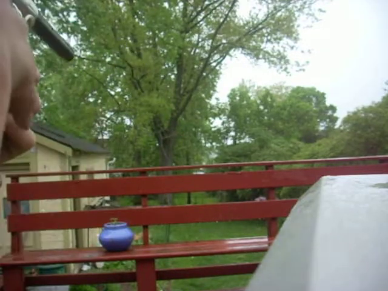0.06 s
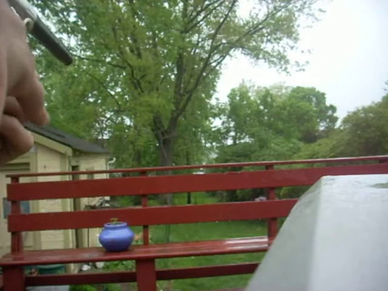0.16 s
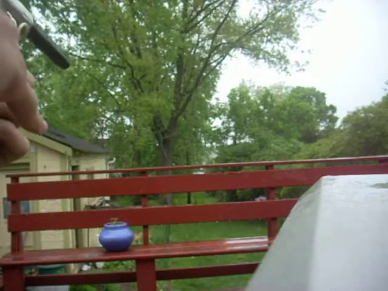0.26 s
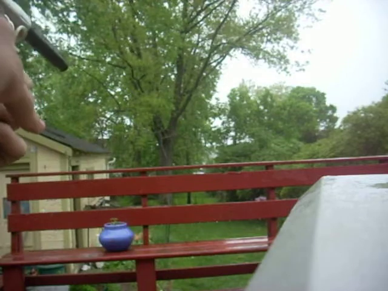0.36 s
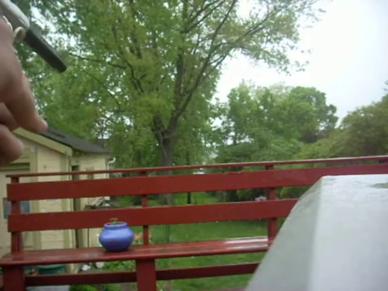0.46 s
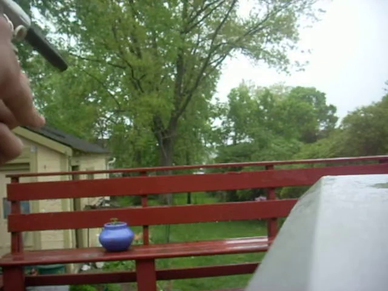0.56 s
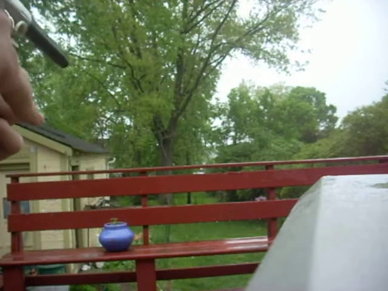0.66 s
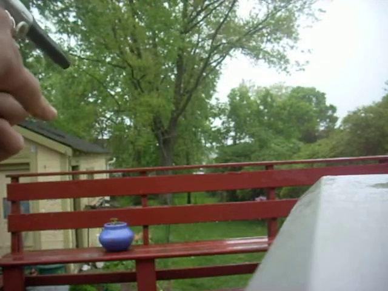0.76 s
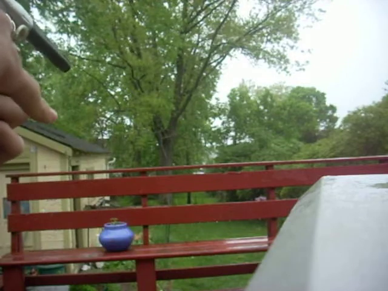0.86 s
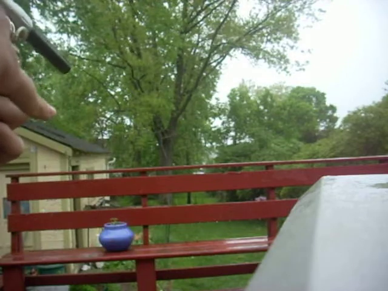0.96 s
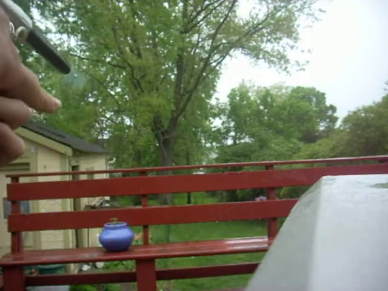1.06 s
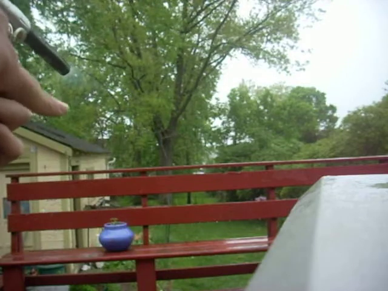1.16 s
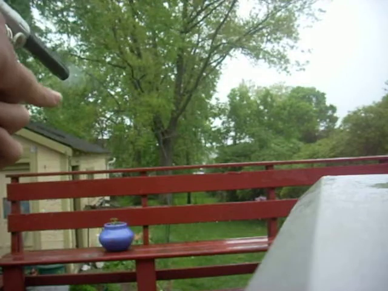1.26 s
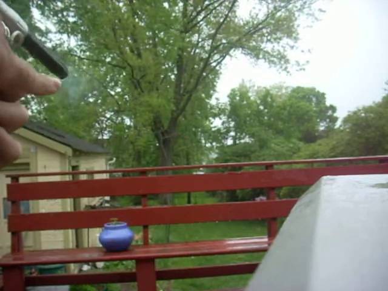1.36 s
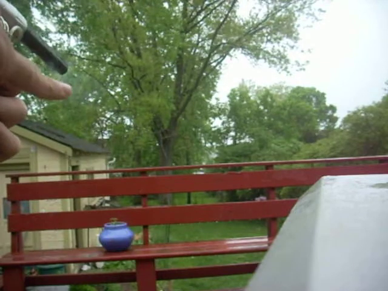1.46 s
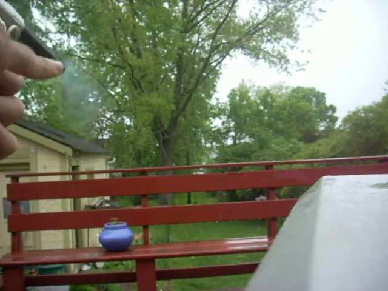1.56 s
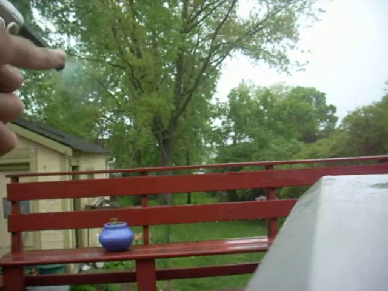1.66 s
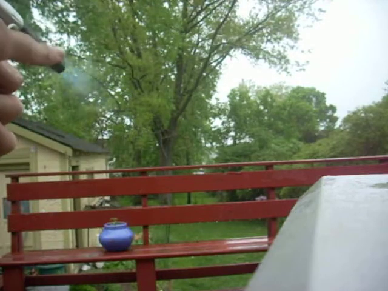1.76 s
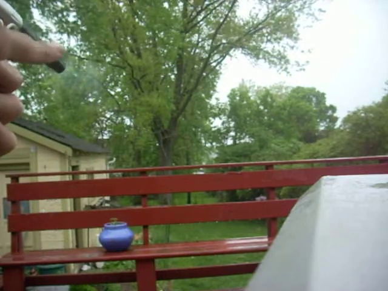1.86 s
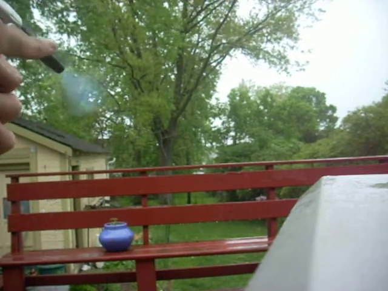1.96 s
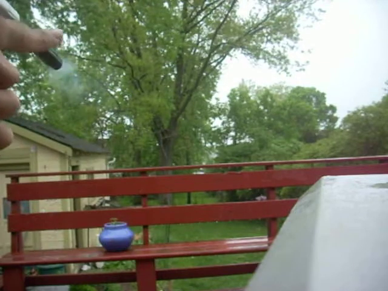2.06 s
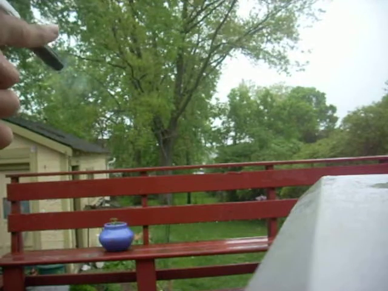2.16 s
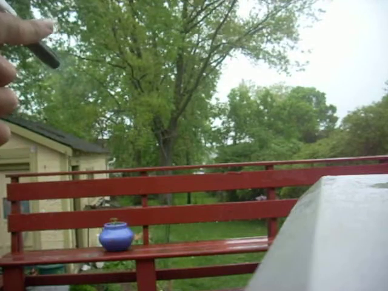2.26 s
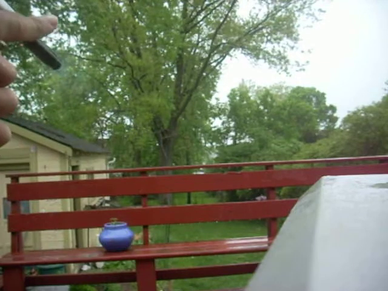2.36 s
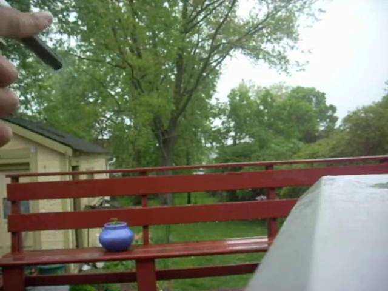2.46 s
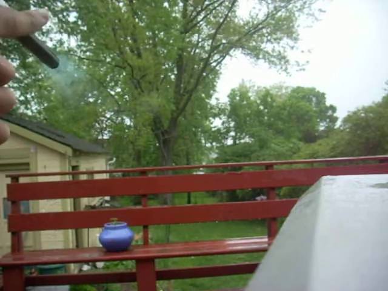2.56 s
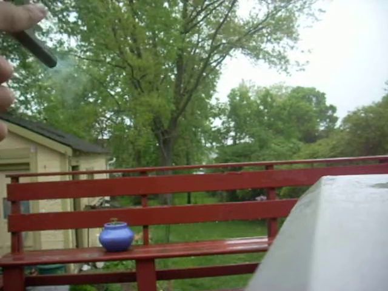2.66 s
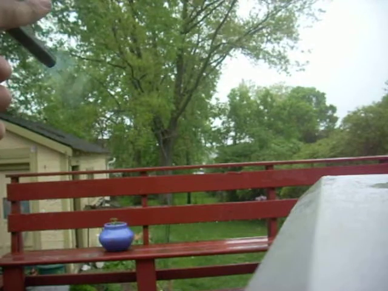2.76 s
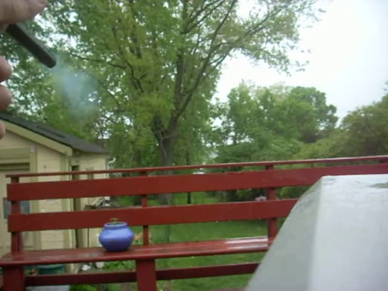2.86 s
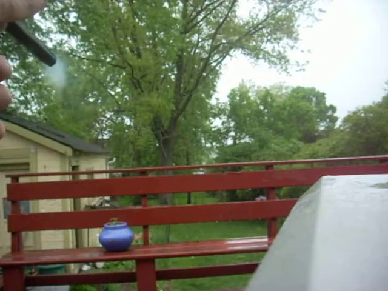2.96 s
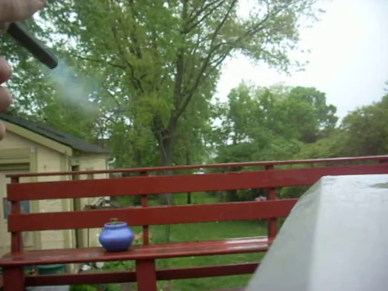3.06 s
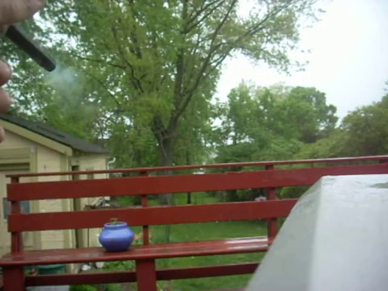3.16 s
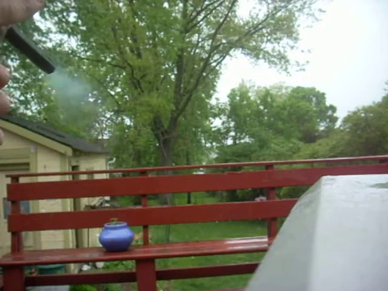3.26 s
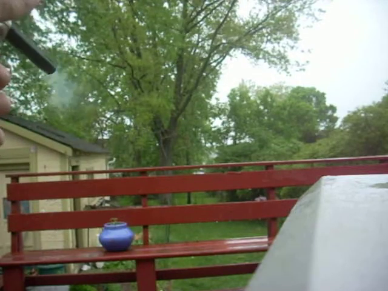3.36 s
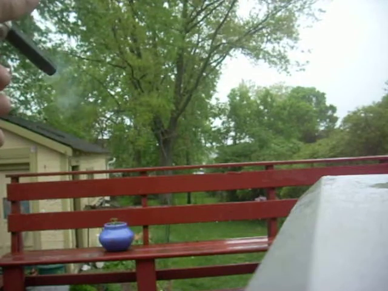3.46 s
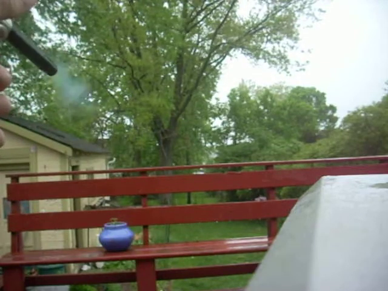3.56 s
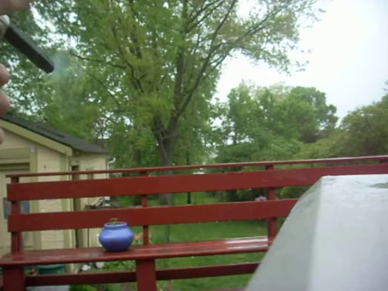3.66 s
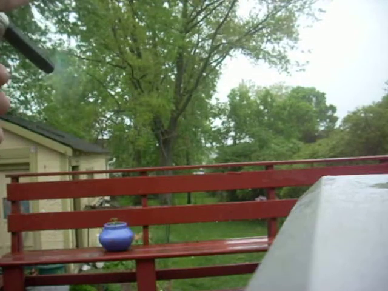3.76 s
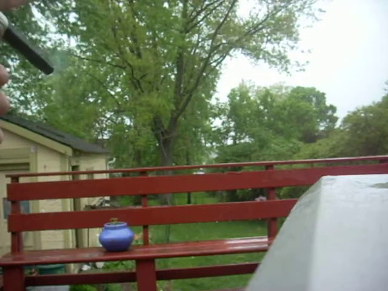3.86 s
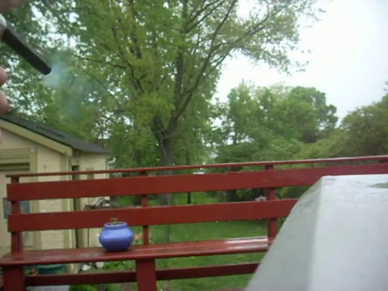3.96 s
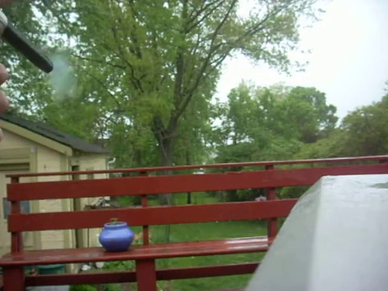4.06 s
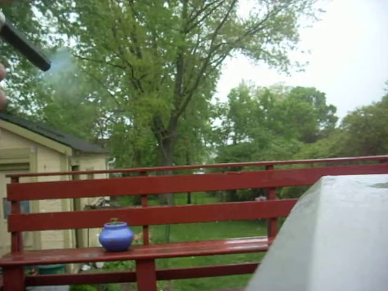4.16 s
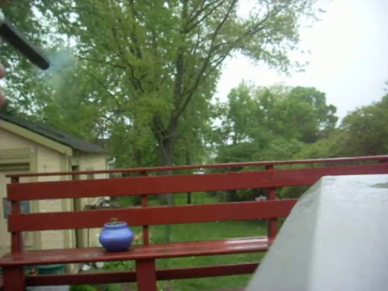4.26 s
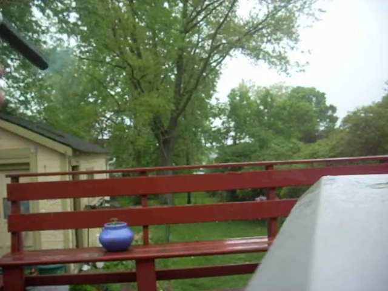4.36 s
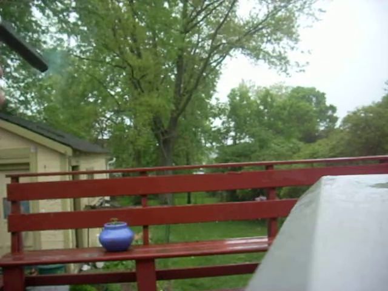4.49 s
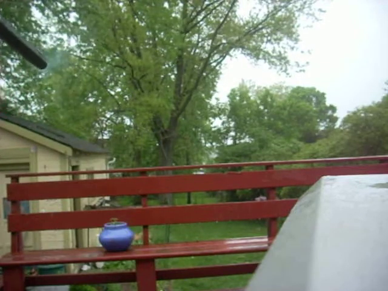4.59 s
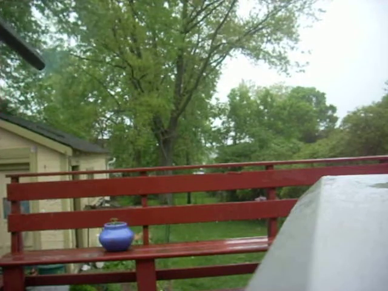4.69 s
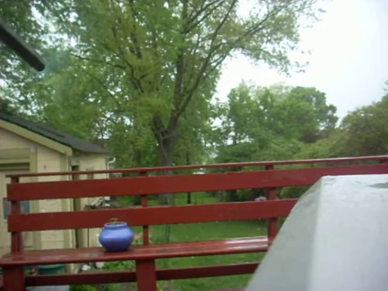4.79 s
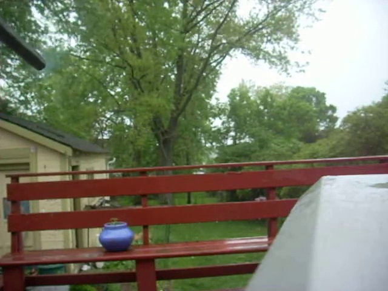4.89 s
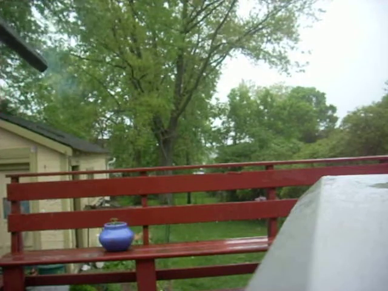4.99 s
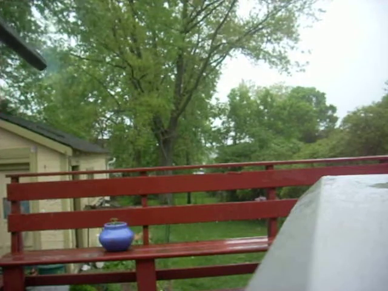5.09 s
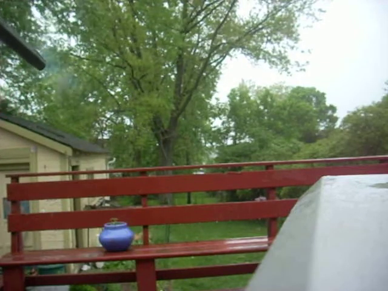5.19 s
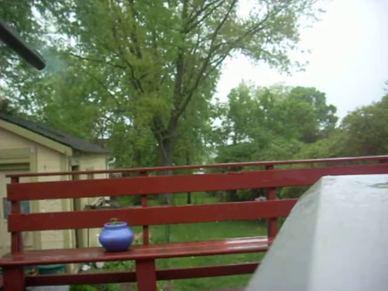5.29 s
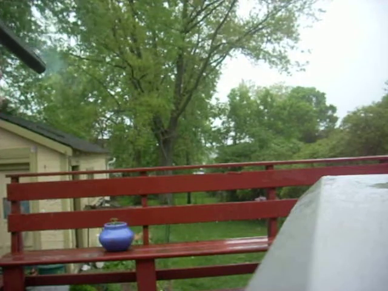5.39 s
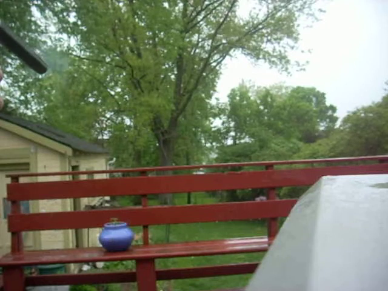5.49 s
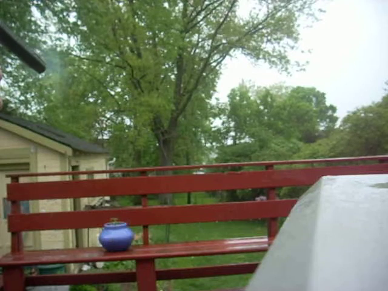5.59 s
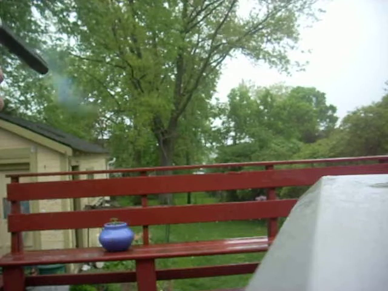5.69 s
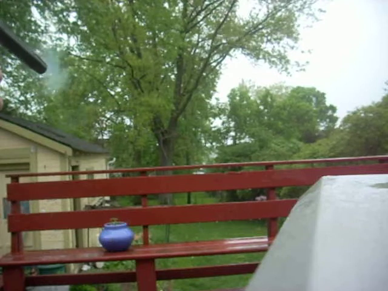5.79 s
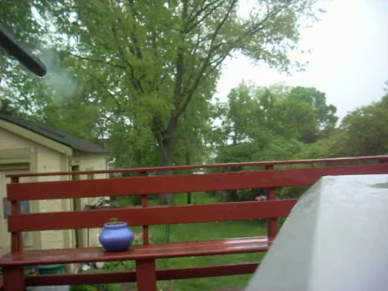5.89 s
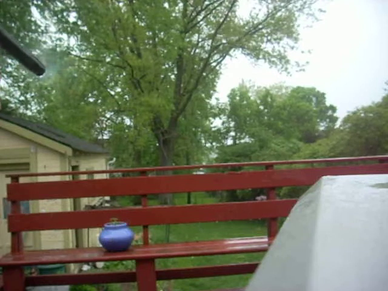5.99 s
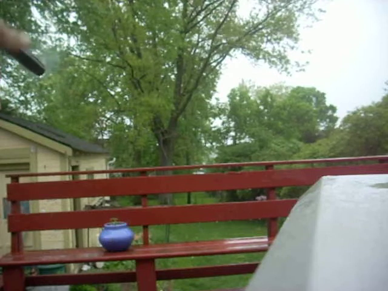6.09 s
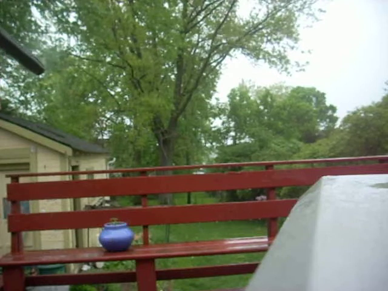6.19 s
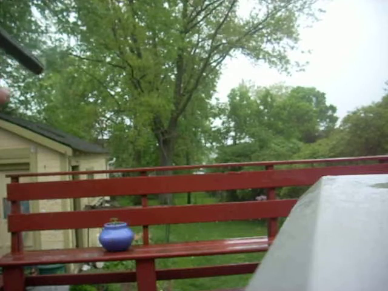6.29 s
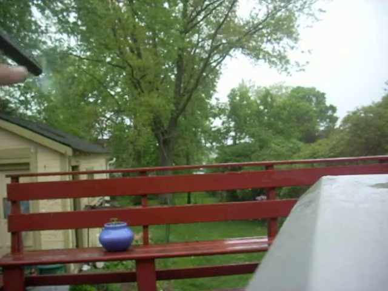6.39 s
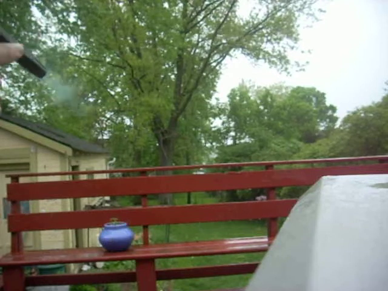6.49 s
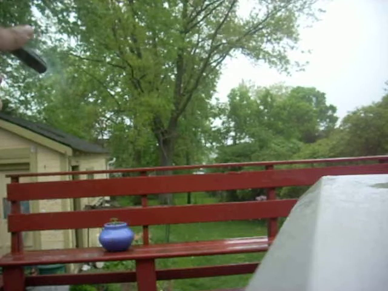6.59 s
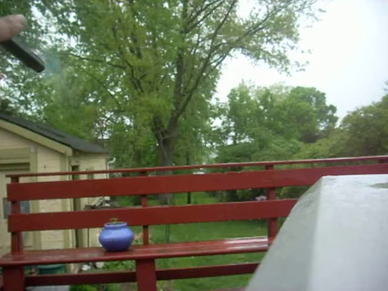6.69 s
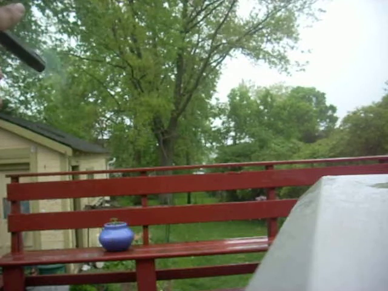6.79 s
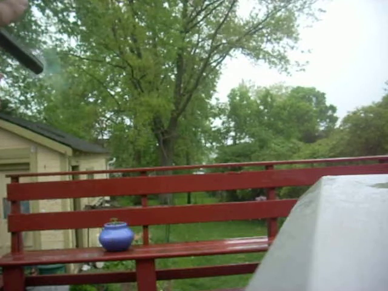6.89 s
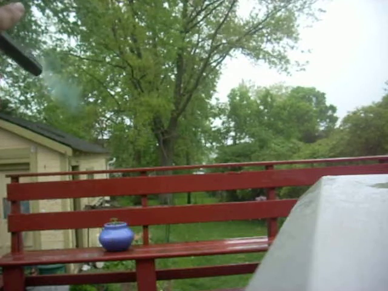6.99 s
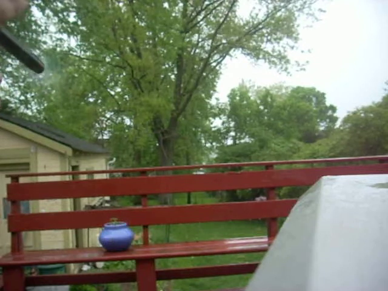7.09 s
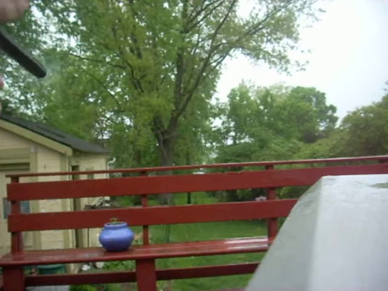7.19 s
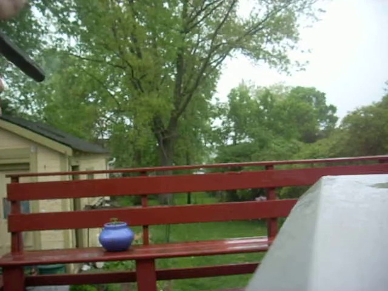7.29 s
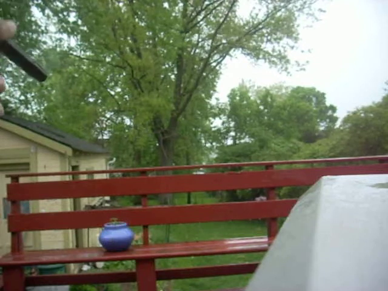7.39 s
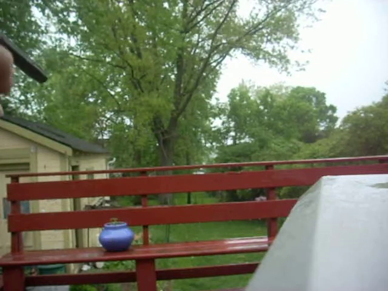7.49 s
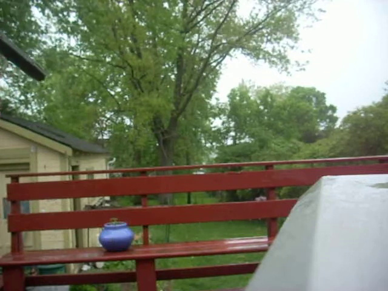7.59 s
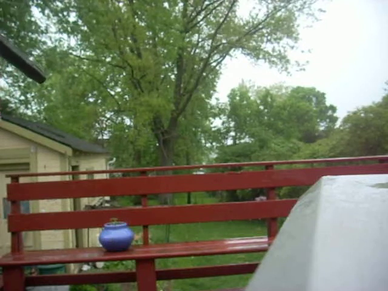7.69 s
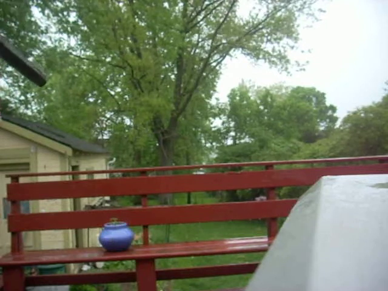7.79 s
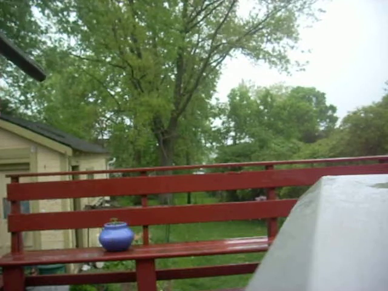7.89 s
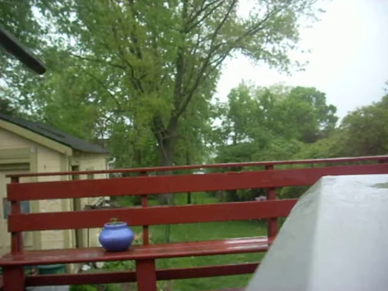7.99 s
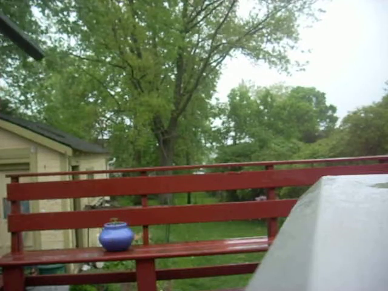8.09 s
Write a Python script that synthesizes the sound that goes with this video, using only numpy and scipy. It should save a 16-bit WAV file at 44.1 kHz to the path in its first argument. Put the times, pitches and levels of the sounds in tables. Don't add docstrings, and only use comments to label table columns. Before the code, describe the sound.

A pump-action paintball marker fires a fast, even string of loud gassy pops with metallic clacks, pauses briefly, then adds five more shots outdoors.

```python
import sys
import numpy as np
from scipy import signal
from scipy.fft import rfft, irfft
from scipy.io import wavfile

SR = 44100
rng = np.random.default_rng(int(sys.argv[2]) if len(sys.argv) > 2 else 0)


def dump(signal):
    limited = np.clip(np.atleast_2d(signal).T, -1, 1)
    pcm = np.round(limited * 32767).astype(np.int16)
    wavfile.write(sys.argv[1], SR, pcm)


def decibels_to_gain(level_db):
    exponent = np.asarray(level_db, float) / 20
    return 10 ** exponent


N = 359194

SHOT_DB = -1.5
COCK_S, COCK_DB = 0.1166, -4.5

# (shot [s], pump drawn back [s], pump slammed home
# [s], slam level [dB])
FIRING_CYCLES = [(0.993, 1.122, 1.1633, -7), (1.296, 1.4124, 1.4426, -3.5), (1.508, 1.58, 1.6107, -0.5),
                 (1.733, 1.847, 1.8816, -3), (1.939, 1.9995, 2.0308, 0), (2.101, 2.177, 2.2079, .5),
                 (2.285, 2.354, 2.389, -4), (2.47, 2.5704, 2.615, -6.5), (2.67, 2.7447, 2.7766, -5),
                 (2.839, 2.924, 2.9517, -3), (3.008, 3.096, 3.1318, -3), (3.205, 3.27, 3.2974, 0.5),
                 (3.368, 3.4514, 3.482, -3), (3.545, 3.624, 3.6536, -3.5), (3.718, 3.807, 3.8397, -4.5),
                 (3.905, 3.9824, 4.0123, -3.5), (4.081, 4.173, 4.2093, 0.5), (4.26, 4.344, 4.3794, 0),
                 (4.435, 4.52, 4.5555, -0.5), (4.609, 4.6904, 4.7217, 2), (4.794, 4.8744, 4.9033, 3),
                 (4.978, 5.0645, 5.0933, 0.5), (5.16, 5.239, 5.2684, 0), (5.331, 5.4214, 5.454, -2),
                 (5.51, 5.593, 5.6316, -0.5), (5.685, 5.766, 5.7967, -1), (5.869, 5.95, 5.9883, 0.5),
                 (6.329, 6.396, 6.4248, -4), (6.476, 6.556, 6.5829, -6.5), (6.647, 6.721, 6.7491, 1),
                (6.815, 6.889, 6.9222, -1), (6.985, 7.064, 7.0928, -0.5)]


def cycles():
    return np.transpose(FIRING_CYCLES)


# (frequency [Hz], level [dB], t60 [s])
BARREL_MODES = [(272.2, -12.5, 0.11), (332.4, -5.5, 0.1), (399.5, -11.5, 0.073), (449.3, 0, 0.056),
                (503, -0.5, 0.023), (565, -13.5, 0.084)]
# (delay [s], strength [signed gain])
PRESSURE_PULSES = [
    (0, -0.12),
    (.0024, -0.5),
    (.0105, -0.17),
    (.021, 0.1),
]


def boom():
    shot_s = cycles()[0]
    spread_db = rng.normal(0, 3.15, (len(shot_s), len(BARREL_MODES)))
    out = 0
    for k, (hz, db, t60) in enumerate(BARREL_MODES):
        gains = decibels_to_gain(SHOT_DB - 2 + db + spread_db[:, k])
        drive = sum(marks(shot_s + delay, strength * gains) for delay, strength in PRESSURE_PULSES)
        out = out + ring(drive, hz, t60)
    return out


# (frequency [Hz], level [dB], t60 [s], delay [s])
MUZZLE_THUMP = [(58, -15.5, 0.067, 0.006), (130, -8, 0.087, 0.0017), (171.5, -5.5, 0.06, 0.0041)]


def thump():
    shot_s = cycles()[0]
    return sum(ring(marks(shot_s + delay, decibels_to_gain(SHOT_DB - 4.5 + db)), hz, t60)
               for hz, db, t60, delay in MUZZLE_THUMP)


# (frequency [Hz], width [Hz], level [dB])
JET_RESONANCES = [(766, 74, -8), (1075, 25, -2.5), (1219, 100, -5.5), (2290, 88, -3), (2916, 28, -4),
                  (3090, 14, -4), (3577, 16, -7.5), (3927, 80, -9.5)]


def gas():
    hiss_db, lead_s = -1.5, 0.008
    flow = decibels_to_gain(escape(np.arange(-lead_s, 0.25, 1 / SR)))
    puffs = signal.fftconvolve(marks(cycles()[0] - lead_s, decibels_to_gain(hiss_db)), flow)[:N]
    crackle = rms_one(grains(1500, spread_db=6.0))
    jet = rms_one(rng.standard_normal(N) + 0.93 * crackle)
    colour = sum((-1) ** k * decibels_to_gain(db) * rms_one(ring(jet, hz, 1.03 / (width + 150)))
                 for k, (hz, width, db) in enumerate(JET_RESONANCES))
    return decibels_to_gain(-7) * puffs * rms_one(colour)


def escape(t):
    leak_db, leak_db_per_s = -30.5, 5000
    open_s, open_db = 0.0015, 1.5
    hold_s, sag_db_per_s, shut_db_per_s = 0.014, 198, 796
    bleed_db, bleed_db_per_s = -26.5, 117
    rise = np.where(t < -open_s / 2, leak_db_per_s * t, (open_db - leak_db) * (t / open_s + 0.5))
    opening = leak_db + rise
    closing = open_db - sag_db_per_s * t - shut_db_per_s * np.maximum(t - hold_s, 0)
    bleed = bleed_db - bleed_db_per_s * t
    return np.minimum(opening, np.maximum(closing, bleed))


# (frequency [Hz], level [dB], t60 [s])
FRAME_MODES = [(853, -7, 0.034), (950, -7, 0.016), (1911, -0.5, 0.0084), (2102, 3, 0.0061),
               (2437, -2, 0.0088), (2850, -6.5, 0.014), (3332, 1.5, 0.0058), (3603, -5.5, 0.017),
               (4260, 9, 0.005), (4324, -1.5, .015)]


def frame(contacts, low_db):
    return sum((-1) ** k * decibels_to_gain(db + low_db * (hz < 1200)) * ring(contacts, hz, t60)
               for k, (hz, db, t60) in enumerate(FRAME_MODES))


def clacks():
    _, _, home_s, slam_db = cycles()
    s, peak_db = np.append(home_s, COCK_S), np.append(slam_db, COCK_DB)
    settle = dying(s + 0.0011, decibels_to_gain(peak_db - 27), 0.023) + dying(s + 0.0089, decibels_to_gain(peak_db - 43.5), 0.12)
    out = frame(settle * rms_one(grains(6000, spread_db=3.0)), low_db=-4.5)

    touch_hit_bounce = [(-0.0012, -22.5), (0.0006, -3.5), (0.0036, -18.5)]   # (delay [s], level [dB])
    colour_db = rng.normal(0, 3.0, (len(s), len(FRAME_MODES)))
    for k, (hz, mode_db, t60) in enumerate(FRAME_MODES):
        hits = sum(marks(s + delay, decibels_to_gain(peak_db + db + colour_db[:, k])) for delay, db in touch_hit_bounce)
        out = out + (-1) ** k * decibels_to_gain(mode_db - 3.7 * (hz < 1200)) * ring(hits, hz, t60)

    grip_db, grip_follows = -21.5, -0.53
    grip = marks(s + 0.00037, decibels_to_gain(grip_db + grip_follows * peak_db - 9.5))
    return out + sum(decibels_to_gain(db) * ring(grip, hz, t60) for hz, db, t60 in FRAME_MODES[:2])


# (time [s], peak level [dB])
HANDLING = [(0.095, -24), (0.13, -19), (0.216, -24), (0.266, -12.5), (0.35, -16.5), (0.515, -31.5),
            (0.9298, -31), (0.962, -30.5), (1.215, -26), (1.475, -17), (1.662, -26), (2.247, -20),
            (4.594, -14), (6.192, -26), (7.216, -17.5), (7.355, -24), (7.5217, -24.5), (7.9816, -33)]


def clicks():
    draw_db, second_stop_s = -7.5, 0.0042
    s, peak_db = np.transpose(HANDLING + [(back_s, draw_db) for back_s in cycles()[1]])
    first_stop = dying(s, decibels_to_gain(peak_db - 21.0), 0.0086)
    second_stop = dying(s + second_stop_s, decibels_to_gain(peak_db - 30.5), 0.031)
    swell = signal.lfilter([0.03], [1, -0.97], first_stop + second_stop)
    contacts = swell * rms_one(grains(4000, spread_db=3.0))
    soft = signal.butter(2, 3700, fs=SR, output="sos")
    return frame(signal.sosfilt(soft, contacts), low_db=-5)


def trigger():
    slip = dying(cycles()[0] - 0.0055, decibels_to_gain(-48.5), 0.067)
    return frame(slip * rms_one(grains(8000, spread_db=3.5)), low_db=-21)


# (frequency [Hz], level [dB], t60 [s])
LOADER_MODES = [(760, -28, 0.025), (853, 7, 0.017), (904, 5.5, 0.014), (983, 8.5, 0.018),
                (994, -6.5, 0.0067), (1453, -4.5, 0.008), (1800, -3, .006)]
# (time [s], peak level [dB])
KNOCKS = [(0.2, -27), (0.215, -26), (0.231, -29), (0.24, -26), (0.268, -31), (1.061, -21), (1.182, -23),
          (4.227, -27), (5.919, -13), (6.009, -19)]


def rattle():
    recoil_db, slam_shake_db, rise_s, settle_t60 = -26, -36.5, 0.008, 0.32
    tilt_s, tilt_db = 0.19, -31.5
    shot_s, _, home_s, slam_db = cycles()
    slam_s, slam_db = np.append(home_s, COCK_S), np.append(slam_db, COCK_DB)
    jolts = (dying(shot_s, decibels_to_gain(recoil_db), settle_t60)
             + dying([tilt_s], decibels_to_gain(tilt_db), settle_t60)
             + dying(slam_s, decibels_to_gain(slam_shake_db + 0.5 * slam_db), settle_t60))
    lag = np.exp(-1 / (rise_s * SR))
    shaking = signal.lfilter([1 - lag], [1, -lag], jolts)
    crowd = sum(decibels_to_gain(db) * ring(grains(600, spread_db=6.5), hz, t60) for hz, db, t60 in LOADER_MODES)
    knock_s, knock_db = np.transpose(KNOCKS)
    knocks = marks(knock_s, decibels_to_gain(knock_db - 18.5))
    single = sum(decibels_to_gain(db) * ring(knocks, hz, t60) for hz, db, t60 in LOADER_MODES[1:4])
    return shaking * rms_one(crowd) + single


def yard():
    band = signal.butter(1, [500, 3800], "band", fs=SR, output="sos")
    wash = signal.sosfilt(band, rng.standard_normal(N))
    return dying(cycles()[0] + 0.024, decibels_to_gain(-29.0), 0.51) * rms_one(wash)


def drizzle():
    band = signal.butter(2, [1200, 4200], "band", fs=SR, output="sos")
    return decibels_to_gain(-57.5) * rms_one(signal.sosfilt(band, grains(402, spread_db=1.5)))


# (frequency [Hz], density [dB per Hz])
AIR_SPECTRUM = [(350, -15.5), (600, -11), (685, -15.5), (884, -17), (2260, -22), (3410, -21.5),
                (4300, -31.5), (5590, -55)]


def air():
    point_hz, point_db = np.transpose(AIR_SPECTRUM)
    hz = np.fft.rfftfreq(N, 1 / SR) + 1
    colour = decibels_to_gain(np.interp(np.log(hz), np.log(point_hz), point_db))
    return decibels_to_gain(-52.5) * rms_one(irfft(rfft(rng.standard_normal(N)) * colour, N))


def buzz():
    frame_hz, crest_s = 29.97, 0.0125
    hum = np.cos(2 * np.pi * frame_hz * (np.arange(N) / SR - crest_s))
    low = signal.butter(2, 220, fs=SR, output="sos")
    noise = rms_one(signal.sosfilt(low, rng.standard_normal(N)))
    steps = np.round(0.42 * hum + 0.2 * noise)
    band = signal.butter(1, [40, 1400], "band", fs=SR, output="sos")
    return decibels_to_gain(-46) * rms_one(signal.sosfilt(band, steps))


def rms_one(x):
    return x / np.sqrt(np.mean(x ** 2) + 1e-20)


def marks(times, gains):
    out = np.full(N, 1e-18)
    at = np.round(np.asarray(times) * SR).astype(int)
    np.add.at(out, np.clip(at, 0, N - 1), gains)
    return out


def ring(clicks, hz, t60):
    r, w = decibels_to_gain(-60 / (t60 * SR)), 2 * np.pi * hz / SR
    return signal.lfilter([0, np.sin(w)], [1, -2 * r * np.cos(w), r * r], clicks)


def dying(times, gains, t60):
    return signal.lfilter([1], [1, -decibels_to_gain(-60 / (t60 * SR))], marks(times, gains))


def grains(per_s, spread_db):
    sizes = decibels_to_gain(spread_db * np.minimum(rng.exponential(1, N), 4)) * rng.choice([-1, 1], N)
    return sizes * (rng.random(N) < per_s / SR) + 1e-18


def scene():
    marker = boom() + thump() + gas() + clacks() + clicks() + trigger()
    background = yard() + drizzle() + air() + buzz()
    return (marker + rattle() + background)[None]


def low_pass(x):
    return signal.sosfilt(signal.butter(12, 16800, fs=SR, output="sos"), x)


def record(dry):
    bass_cut = signal.butter(1, 20, "high", fs=SR, output="sos")
    rounded = signal.sosfilt(bass_cut, 0.91 * np.tanh(dry / 0.83))
    narrow = signal.sosfiltfilt(signal.cheby2(9, 45, 4898, fs=SR, output="sos"), rounded)
    clipped = np.clip(narrow, -0.705, 0.705)
    mix = signal.sosfiltfilt(signal.cheby2(12, 40, 16850, fs=SR, output="sos"), clipped)
    return low_pass(mix)


dry = scene()
out = record(dry)
dump(out)
```